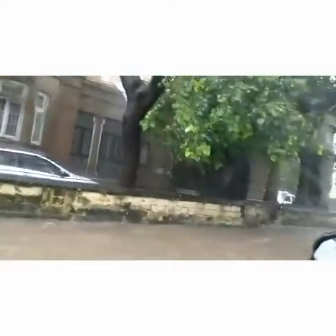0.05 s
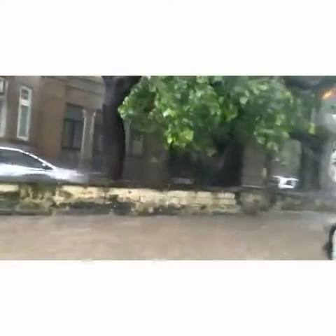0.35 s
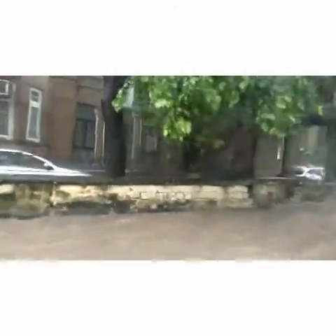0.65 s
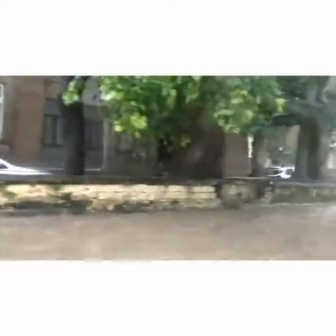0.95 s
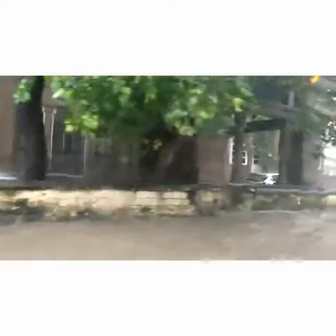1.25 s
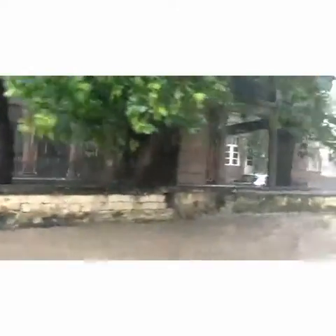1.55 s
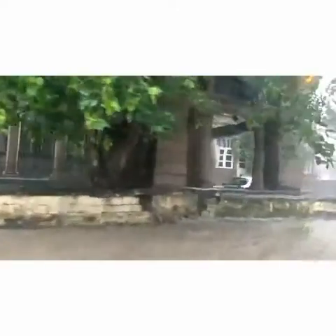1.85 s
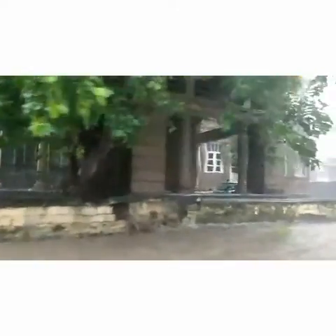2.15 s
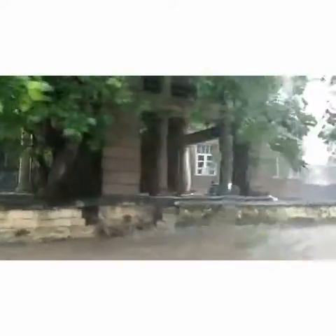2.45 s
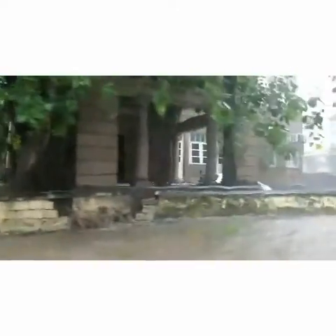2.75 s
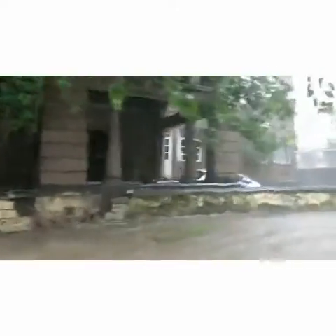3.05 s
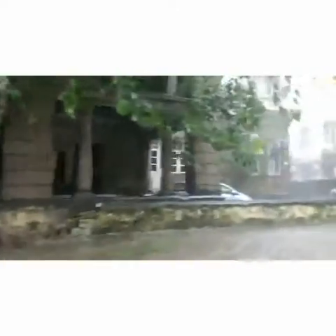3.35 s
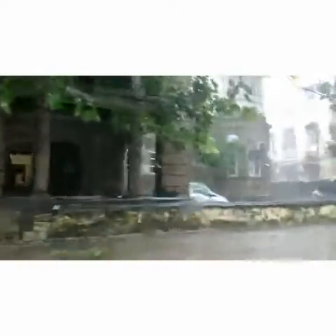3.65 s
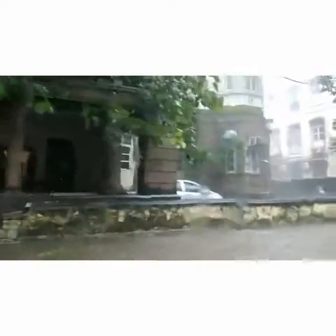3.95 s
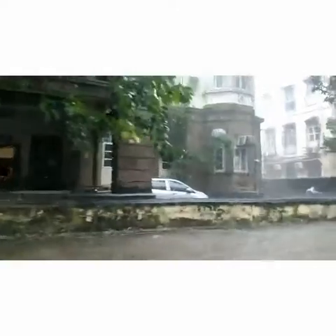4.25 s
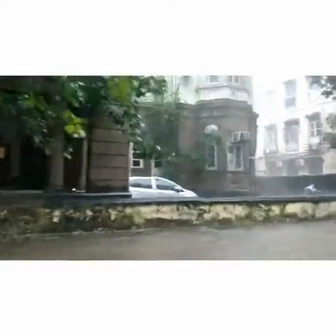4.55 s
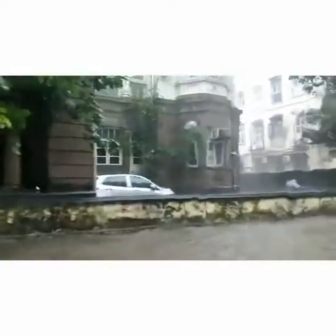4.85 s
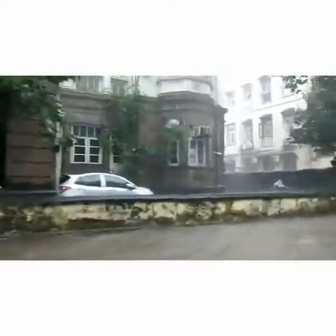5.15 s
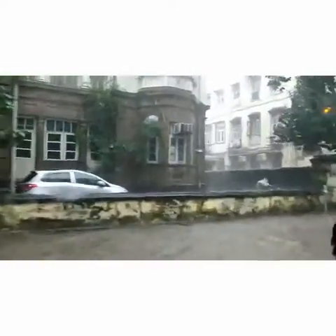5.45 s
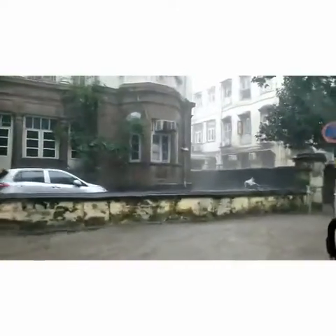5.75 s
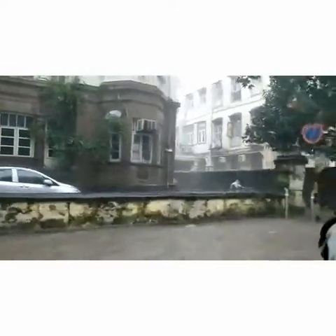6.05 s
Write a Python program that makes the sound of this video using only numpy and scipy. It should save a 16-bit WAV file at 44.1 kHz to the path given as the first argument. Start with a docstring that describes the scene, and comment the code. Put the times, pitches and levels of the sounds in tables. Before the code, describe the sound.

Inside an idling car, a downpour drums overhead and splats on glass while wipers hum and floodwater rumbles low.

```python
"""A downpour drums on the steel roof of a car, heard from inside as it idles in a flooded street.
Rain patters on the glass, droplets fizz, fat drops splat; a steady leak plinks on the trim and one
hard drop clinks. The flood washes low through the body shell, which gives a few dull knocks.
Engine firings throb in the cabin air and the wiper motor hums once a sweep, sagging under load."""
import sys
import numpy as np
from scipy import signal
from scipy.fft import rfft, irfft
from scipy.io import wavfile
from scipy.ndimage import uniform_filter1d

SR = 44100
rng = np.random.default_rng(int(sys.argv[2]) if len(sys.argv) > 2 else 0)


def digitize_waveform(pressure):
    """Quantize a signal to 16-bit integers and store it at the path in sys.argv[1].

    Rows of a 2-D input are taken as channels; values are limited to [-1, 1].
    """
    field = np.atleast_2d(pressure).T
    bounded = np.clip(field, -1, 1)
    quanta = np.round(bounded * 32767).astype(np.int16)
    wavfile.write(sys.argv[1], SR, quanta)


N = 273420
TIME_S = np.arange(N) / SR
FREQ_HZ = np.maximum(np.arange(N // 2 + 1) * SR / N, 1)

# rain on the roof: time_s, strength_db
ROOF_RAIN = [(0.0, 3.5), (0.45, 0.5), (0.7, 3.5), (1.4, 2), (1.85, 2), (2.2, -2.5), (2.55, 1.2),
             (3.1, -1.5), (3.3, 0.7), (3.85, -0.5), (4.65, 1.6), (4.8, -1.7), (5.1, -1.5), (5.4, -1),
             (5.65, 1.7), (5.85, -3), (5.97, -2.5), (6.2, 0)]
# roof response under its lining: freq_hz, gain_db
ROOF_RESPONSE = [(70, -17), (160, -8.5), (240, -8), (380, -2.5), (520, -2.5), (620, -3.5), (780, -9.5),
                 (920, -16.5), (1250, -19.5), (2000, -37), (4000, -84)]
# panel and cabin resonances: freq_hz, width_hz, lift_db
PANEL_MODES = [(266.5, 27.7, 8.5), (351.6, 96, 6.5), (400.6, 51, 3.5), (440, 36, 4.5), (481.6, 19.6, 7.5),
               (514, 10, 5), (553, 10, 6.5), (720, 93, 3.5), (808, 15, 6.5), (1130, 144, 5.5)]
# roof balance: freq_hz, left_minus_right_db
ROOF_PAN = [(120, 4.5), (270, 2.5), (450, 4), (700, 8), (950, 11.5), (1400, -2)]
# dollops of water on the roof: start_s, level_db
DOLLOPS = [(.324, -25), (.59, -29), (.905, -23), (1.035, -24), (1.336, -29), (1.608, -17), (2.112, -18),
           (2.961, -11.5), (3.307, -19), (3.55, -16), (3.723, -20), (3.923, -23), (4.23, -26), (4.36, -26),
           (4.675, -19), (5.191, -16), (5.39, -16), (5.814, -19), (6.098, -21)]
# rain on the windows: time_s, strength_db
GLASS_RAIN = [(0, 1), (.9, 1.1), (1.85, 1), (2.2, -1), (2.55, 0.5), (3.1, -1.5), (3.5, 0.7), (3.9, -1),
              (4.7, -.6), (5.05, 0.5), (5.65, 1), (5.95, -2), (6.2, 0)]
# window response to drops: freq_hz, left_db, right_db
GLASS_RESPONSE = [(482, 3.5, 10), (1520, 0.5, 1), (2300, -7.5, 0), (2737, -4.5, 3), (3400, -8.5, -13),
                  (4430, -7, -5.5), (6140, -12, -3), (7300, -20, -19), (9020, -39.5, -41.5),
                  (11370, -27, -31.5), (13000, -22, -38), (15400, -21, -38)]
# slap, crack and spray bands: low_hz, high_hz
DROP_BANDS = [(500, 3300), (3300, 9000), (9000, 17000)]
# finest spray on the glass: time_s, level_db
SPRAY = [(0.0, -43), (0.3, -45.5), (0.6, -46.5), (0.85, -39.5), (1.06, -48), (1.2, -43), (1.45, -43.5),
         (2.25, -46), (2.5, -42.5), (2.85, -46.5), (3.75, -46), (4.25, -47), (4.6, -43.5), (4.8, -47),
         (5.3, -43), (5.55, -41.5), (5.9, -46.5), (6.2, -46.5)]
# idle throb: time_s, level_db
IDLE = [(0.0, -27), (0.3, -18.5), (1.05, -25.5), (2.0, -18.5), (2.95, -23.5), (3.7, -20), (4.3, -21.5),
        (5.7, -18.5), (6.2, -21.5)]
# flood and traffic through the body shell: freq_hz, gain_db
FLOOD_SPECTRUM = [(15, -16), (36, 3), (52, -5), (85, -7), (115, -3.5), (145, -9), (200, -6), (320, -18),
                  (1000, -76.5), (3000, -115)]
# low buffets, most as the wipers reverse: peak_s, length_s, lift_db
BUFFETS = [(.65, 0.33, 3), (1.92, .25, 1), (3.25, 0.17, 3), (4.137, 0.07, 4), (4.6, 0.11, 4), (5.9, 0.3, 3)]
# droplets on the near window: start_s, level_db
FLECKS = [(.099, -38), (.477, -35.5), (.829, -34), (1.342, -33), (1.426, -33), (1.486, -42), (1.679, -34),
          (1.774, -37), (3.593, -32), (3.977, -34), (4.155, -36), (4.57, -33.5), (5.468, -35), (5.515, -33),
          (5.56, -35), (5.942, -36)]
# drips on the trim: start_s, pitch_hz, level_db
DRIPS = [(.105, 1940, -33), (.371, 1930, -36), (1.056, 1980, -34), (1.745, 1970, -34), (2.42, 1960, -35),
         (3.091, 1940, -34), (3.795, 1940, -33), (4.451, 1930, -33), (5.139, 1960, -36), (5.81, 1990, -36)]
# body knocks: start_s, pitch_hz, t60_s, level_db
KNOCKS = [(.179, 84.6, 0.12, -11.5), (0.871, 55.7, 0.54, -19), (4.595, 31, 0.31, -3)]
# fat drops on the glass: start_s, t60_s, slap_db, crack_db, spray_db, left_minus_right_db
SPLATS = [(0.1805, 0.003, -8, -12.5, -24, -3), (0.189, 0.011, -15, -30, -25, -11),
          (0.321, 0.096, -26, -34, -34, 0), (0.924, 0.12, -28, -29, -31, 3),
          (1.098, 0.016, -20, -41, -44, 5), (1.301, 0.13, -34, -26, -36, 5),
          (1.789, 0.069, -24, -22, -38, -1), (2.513, 0.072, -32, -32.5, -37, 0),
          (2.6496, 0.015, -40, -16, -25, -11), (2.72, 0.039, -31, -28, -35, 3),
          (2.77, 0.075, -32, -30.5, -37, 2), (2.959, 0.13, -19, -25.5, -31.5, 0),
          (3.15, 0.39, -29, -32.5, -52, -3), (3.231, 0.12, -22.5, -24, -38, -2),
          (3.556, 0.12, -27, -27.5, -41, -2), (3.7502, 0.024, -25, -24.5, -46, -4),
          (4.049, 0.13, -32, -29.5, -39, -3), (4.15, 0.067, -32, -32, -42, -4),
          (4.444, 0.09, -25.5, -36, -48, 0), (4.886, 0.12, -35, -40, -36, -3),
          (5.625, .05, -29, -31, -37, 0), (5.658, 0.2, -31, -27.5, -38, -4.5),
          (5.713, 0.12, -25, -33, -34, 2), (6.095, 0.12, -26.5, -29, -37, -1)]
# wiper motor over one sweep: age_s, pitch_hz, gain_db
SWEEP = [(0, 73.44, -12), (.08, 70.2, -0.5), (.22, 68.48, -8), (.36, 56.5, -4.5), (.6, 54.38, -10)]
# trim modes under a hard drop: pitch_hz, t60_s, level_db
CLINK_MODES = [(1502, .06, -30), (2560, .04, -23.5), (3050, .022, -25), (3930, .025, -27)]


def undb(db):
    """Decibels to gain."""
    return 10 ** (np.asarray(db) / 20)


def unit(x):
    """Scale to rms 1."""
    return x / np.sqrt(np.mean(x ** 2))


def curves(table, at_s=TIME_S):
    """Table columns interpolated over time."""
    time_s, *columns = np.transpose(table)
    return [np.interp(at_s, time_s, column) for column in columns]


def spectrum(table):
    """Table columns interpolated over log frequency."""
    hz, *columns = np.transpose(table)
    return np.array([np.interp(np.log(FREQ_HZ), np.log(hz), column) for column in columns])


def colour(x, gain_db):
    """Minimum-phase filter: rings after a blow."""
    cepstrum = irfft(gain_db * np.log(10) / 20, N)
    cepstrum[..., 1:N // 2] *= 2
    cepstrum[..., N // 2 + 1:] = 0
    return irfft(rfft(x) * np.exp(rfft(cepstrum)), N)


def band(x, low_hz, high_hz):
    """Steep band-pass."""
    return signal.sosfilt(signal.butter(4, [low_hz, high_hz], "band", fs=SR, output="sos"), x)


def walk(rate_hz):
    """Random steps, smoothed twice; rms 1."""
    hold = int(SR / rate_hz)
    steps = np.repeat(rng.standard_normal(N // hold + 1), hold)
    return unit(uniform_filter1d(uniform_filter1d(steps, hold), hold)[:N])


def fade(start_s, t60_s):
    """Exponential decay from start_s."""
    age_s = TIME_S - start_s
    return (age_s >= 0) * np.exp(-np.log(1000) * np.clip(age_s / t60_s, 0, 2))


def ring(blows, pan_db):
    """One damped note a blow, pushed for about a cycle; positive pan is left."""
    notes = 0
    for start_s, hz, t60_s, db in blows:
        envelope = uniform_filter1d(fade(start_s, t60_s), size=int(SR / hz))
        notes = notes + undb(db) * envelope * np.sin(2 * np.pi * hz * (start_s - TIME_S))
    return notes * undb([[pan_db / 2], [-pan_db / 2]])


def drops(count, scatter_db, max_lag_ms=0):
    """Random impacts of uneven size, each reaching one side first."""
    when, side, size, sign = rng.random((count, 4)).T
    impulse = undb(-scatter_db * np.log(1 - .995 * size)) * np.sign(sign - .5)
    lag = (side - .5) * max_lag_ms * SR / 1000
    arrivals = [np.round(when * N + way * lag).astype(int) % N for way in (1, -1)]
    return np.array([np.bincount(arrival, impulse, N) for arrival in arrivals])


def roof(level_db=-20, rain_db_per_db=0.8, flutter_db=0.58):
    """Dense drops drum on a damped steel panel; each dollop adds a brief burst."""
    panel_db = spectrum(ROOF_RESPONSE) + spectrum(ROOF_PAN) * np.array([[.5], [-.5]])
    modes_db = sum(db / (1 + (2 * (FREQ_HZ - hz) / width_hz) ** 2) for hz, width_hz, db in PANEL_MODES)
    drumming = unit(colour(drops(count=14000, scatter_db=1, max_lag_ms=0.29), panel_db + modes_db))
    dollops = uniform_filter1d(sum(undb(db) * fade(s, t60_s=0.13) for s, db in DOLLOPS), size=130)
    rain_db = rain_db_per_db * curves(ROOF_RAIN)[0]
    return drumming * (undb(level_db + rain_db + flutter_db * walk(16)) + dollops)


def flurries(t60_s):
    """Envelope of overlapping showers: fast rise, slower decay; rms 1."""
    bursts = np.abs(drops(count=700, scatter_db=2)[0])
    showers = signal.fftconvolve(bursts - bursts.mean(), fade(0, t60_s))[:N]
    return unit(uniform_filter1d(showers, size=420))


def ticks(count, scatter_db, t60_s):
    """Drops break on glass, each a brief fizz scattered by the cabin."""
    power = signal.fftconvolve(drops(count, scatter_db)[0] ** 2, fade(0, t60_s / 2))[:N]
    fizz = unit(np.sqrt(np.abs(power))) * rng.standard_normal((2, N))
    return colour(fizz, spectrum(GLASS_RESPONSE))


def glass(patter_db=-29.5, spray_trim_db=-0.2, flurry_db=1.2, spray_flurry_db=2):
    """Showers on the windows: large drops slap, small ones crackle, the finest spray."""
    swell_db = flurry_db * flurries(t60_s=0.14)
    slap = band(ticks(count=18000, scatter_db=2.4, t60_s=.05), *DROP_BANDS[0])
    crack = band(ticks(count=14000, scatter_db=3.2, t60_s=.038), *DROP_BANDS[1])
    spray = band(ticks(count=16000, scatter_db=3.2, t60_s=.05), *DROP_BANDS[2])
    gust = walk(16)
    patter = unit(slap * undb(swell_db + 0.7 * walk(18)) + crack * undb(swell_db + 0.9 * gust))
    patter *= undb(patter_db + curves(GLASS_RAIN)[0])
    spray = unit(spray * undb(swell_db + 0.53 * gust + spray_flurry_db * flurries(t60_s=0.25)))
    return patter + spray * undb(spray_trim_db + curves(SPRAY)[0])


def engine(firing_hz=24.85, octave_db=-19, waver_db=1.1):
    """Each firing pumps the cabin air: a slightly uneven throb."""
    phase = 2 * np.pi * np.cumsum(firing_hz * (1 + 0.013 * walk(7.84))) / SR
    throb = unit(np.sin(phase) + undb(octave_db) * np.sin(2 * phase))
    return throb * undb(curves(IDLE)[0] + waver_db * walk(5.1))


def flood(level_db=-24.5, surge_db=0.8, side_db=-18):
    """The body shell passes only the street's low wash, with its surges; low buffets shake it, most as the
    wipers reverse."""
    mid, side = unit(colour(rng.standard_normal((2, N)), spectrum(FLOOD_SPECTRUM)))
    wash = mid + undb(side_db) * side * np.array([[1], [-1]])
    buffet_db = sum(db * np.exp(-(2 * (TIME_S - s) / length_s) ** 2) for s, length_s, db in BUFFETS)
    return wash * undb(level_db + surge_db * walk(14) + buffet_db)


def flecks(t60_s=0.048):
    """Droplets burst on the near window in a short, bright fizz."""
    fizz = unit(band(ticks(count=30000, scatter_db=1.5, t60_s=.004), low_hz=10800, high_hz=17000))
    return fizz * uniform_filter1d(sum(undb(db) * fade(s, t60_s) for s, db in FLECKS), size=200)


def drips(t60_s=.07):
    """Drips, most from one steady leak, ring the trim on the right."""
    return ring([(s, hz, t60_s, db) for s, hz, db in DRIPS], pan_db=-18.5)


def knocks():
    """The car body knocks: low, damped notes."""
    return ring(KNOCKS, pan_db=1)


def splats():
    """Fat drops shatter on the glass into droplet clouds: slap, crack and spray."""
    cloud = ticks(count=60000, scatter_db=0.3, t60_s=0.0045)
    envelopes = np.array([uniform_filter1d(fade(s, t60_s), size=int(SR * t60_s / 24))
                          for s, t60_s, *_ in SPLATS])
    _, _, *levels_db, pan_db = np.transpose(SPLATS)
    sides_db = np.array([pan_db, -pan_db]) / 2
    return sum(unit(band(cloud, *edges_hz)) * (undb(db + sides_db) @ envelopes)
               for edges_hz, db in zip(DROP_BANDS, levels_db))


def wipers(first_s=.495, period_s=1.326, level_db=-23, rub_db=-2, octave_db=-11):
    """The motor hum sags as the blades take load; rubber shudders over wet glass."""
    age_s = (TIME_S - first_s) % period_s
    motor_hz, swell_db = curves(SWEEP, age_s)
    phase = 2 * np.pi * np.cumsum(motor_hz * (1 + 0.029 * walk(25))) / SR
    hum = np.sqrt(2) * (np.sin(phase) + undb(octave_db) * np.sin(2 * phase))
    rub = unit(band(rng.standard_normal(N), low_hz=42.5, high_hz=163))
    moving = uniform_filter1d(1. * (age_s < SWEEP[-1][0]), size=1500)
    return moving * undb(level_db + swell_db) * (hum + undb(rub_db) * rub)


def clink(start_s=1.099):
    """One hard drop rings several trim modes at once."""
    return ring([(start_s, *mode) for mode in CLINK_MODES], pan_db=-2)


def scene():
    """Rain on the car over its machinery and the flood; stereo."""
    rain = roof() + glass() + splats() + flecks()
    return rain + drips() + clink() + knocks() + wipers() + engine() + flood()


def record(dry, ceiling=.85, cutoff_hz=15750):
    """Soft peak limiter, then a steep low-pass."""
    rounded = dry / (1 + (dry / ceiling) ** 6) ** (1 / 6)
    return signal.sosfilt(signal.ellip(10, .1, 80, cutoff_hz, fs=SR, output="sos"), rounded)


dry = scene()
out = record(dry)
digitize_waveform(out)
```